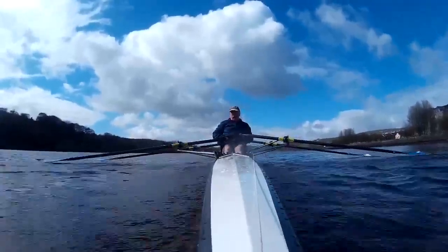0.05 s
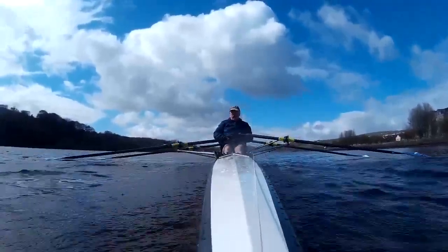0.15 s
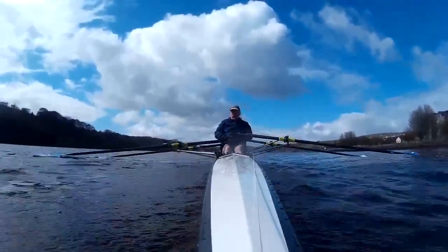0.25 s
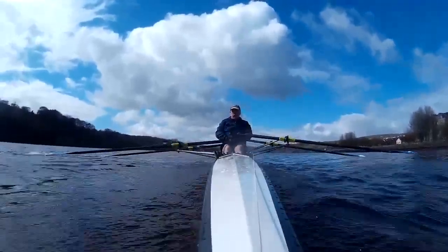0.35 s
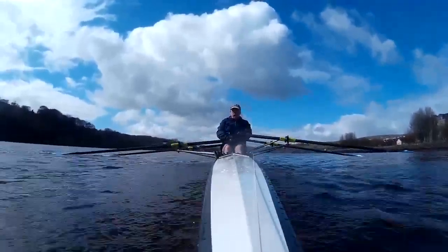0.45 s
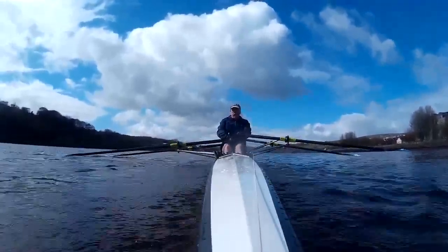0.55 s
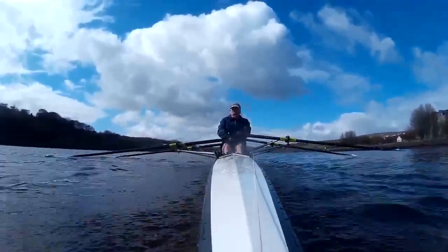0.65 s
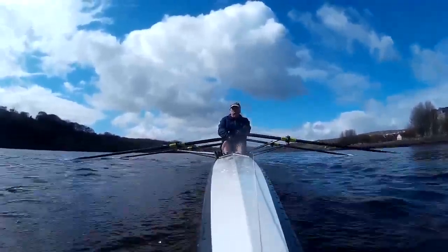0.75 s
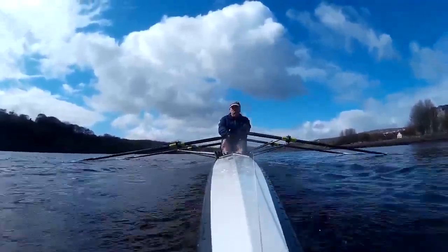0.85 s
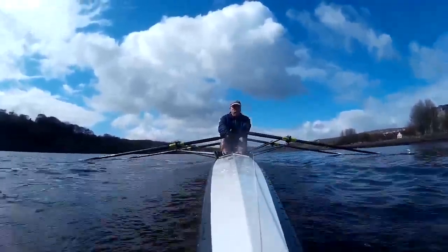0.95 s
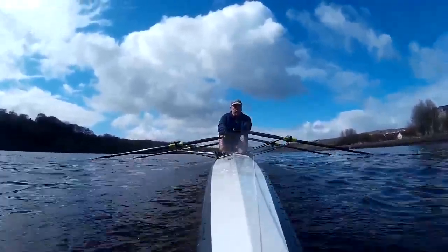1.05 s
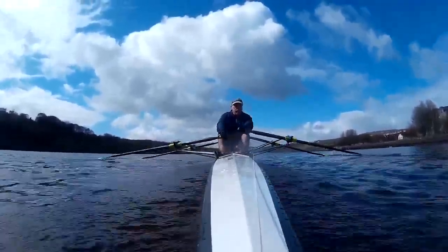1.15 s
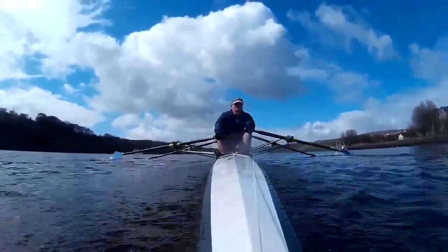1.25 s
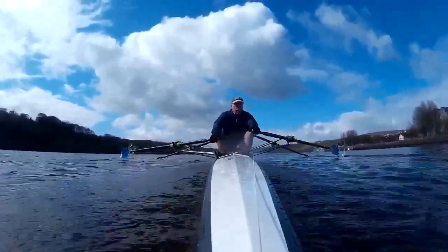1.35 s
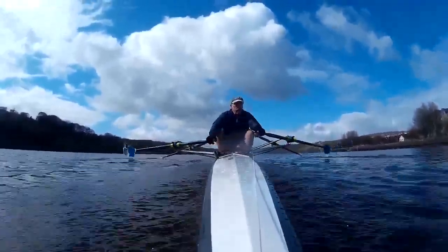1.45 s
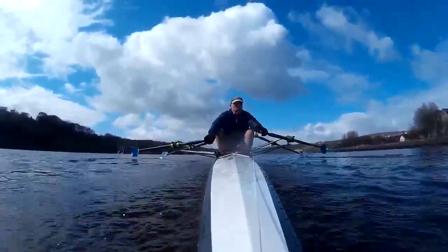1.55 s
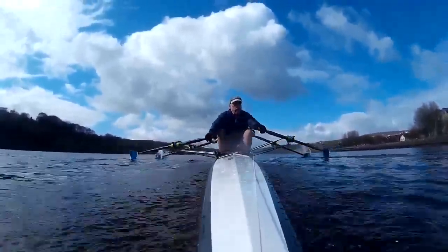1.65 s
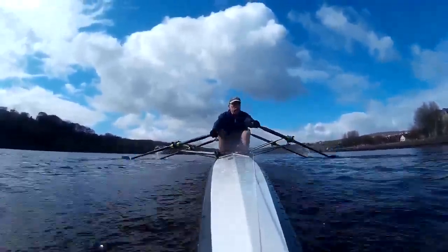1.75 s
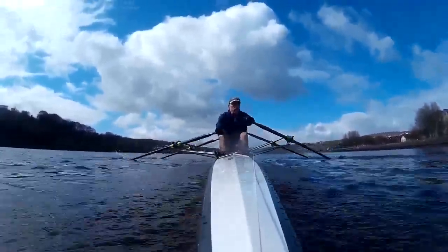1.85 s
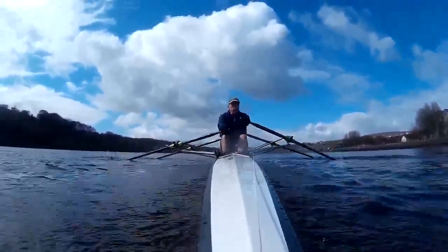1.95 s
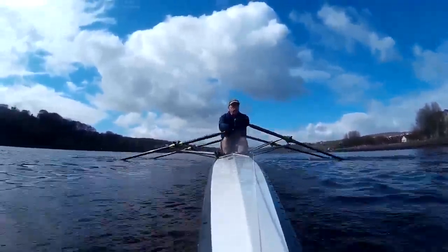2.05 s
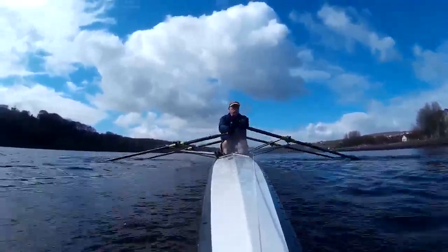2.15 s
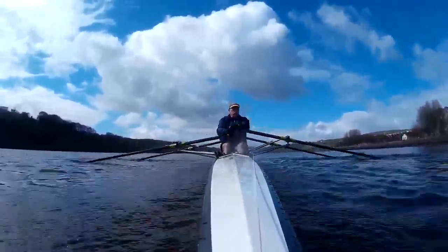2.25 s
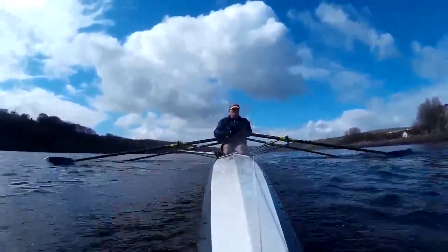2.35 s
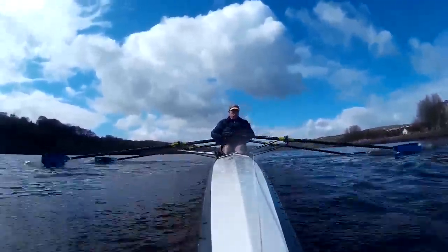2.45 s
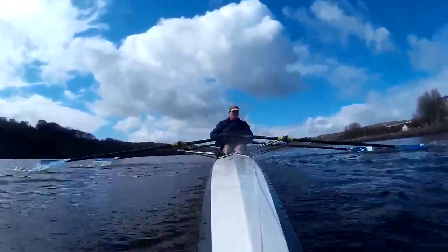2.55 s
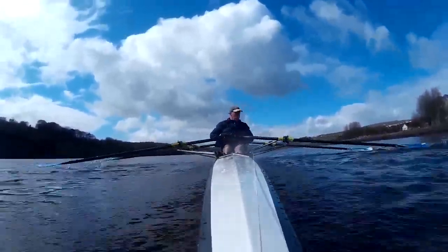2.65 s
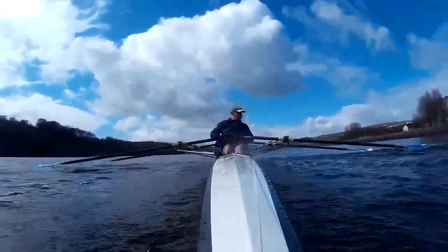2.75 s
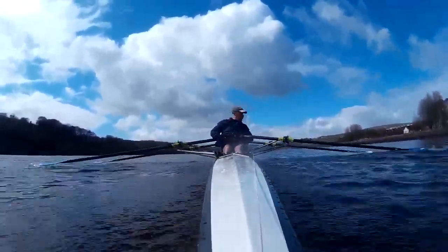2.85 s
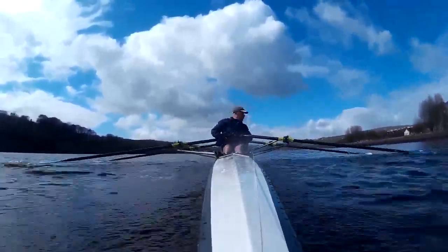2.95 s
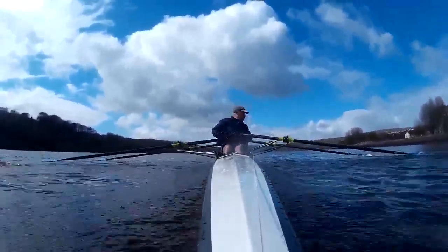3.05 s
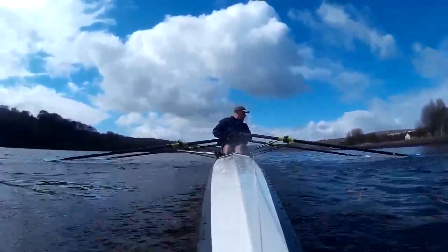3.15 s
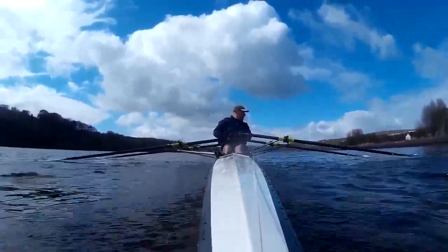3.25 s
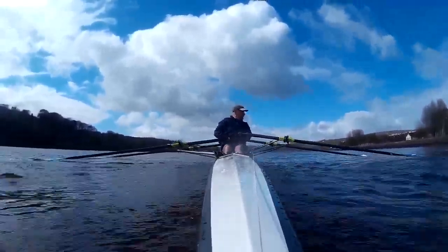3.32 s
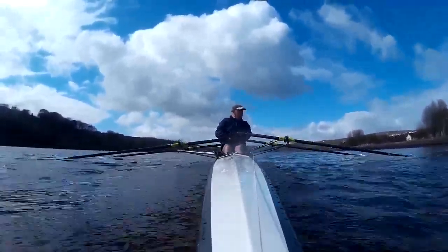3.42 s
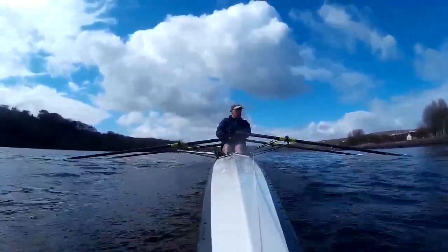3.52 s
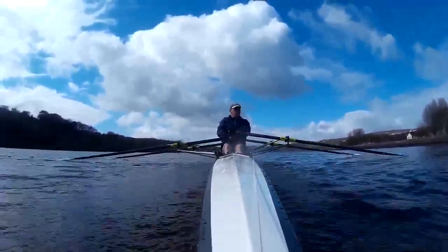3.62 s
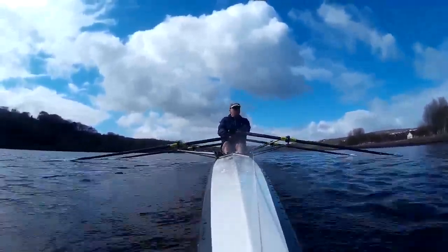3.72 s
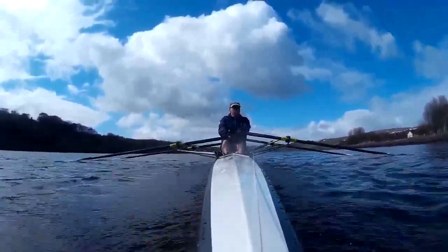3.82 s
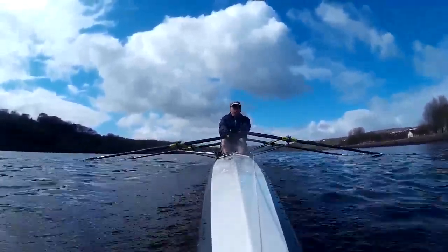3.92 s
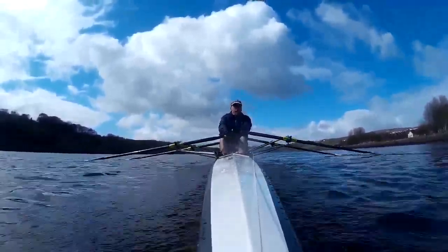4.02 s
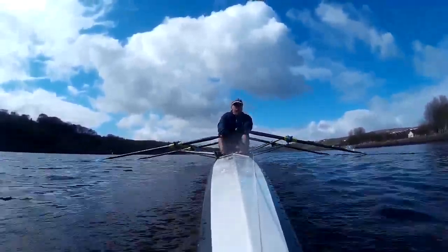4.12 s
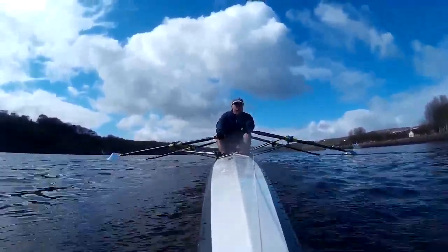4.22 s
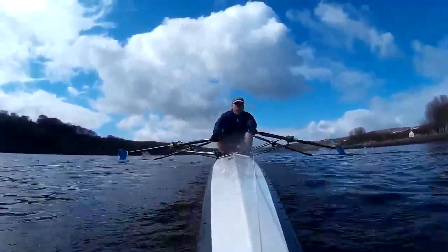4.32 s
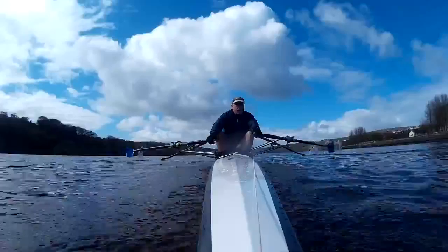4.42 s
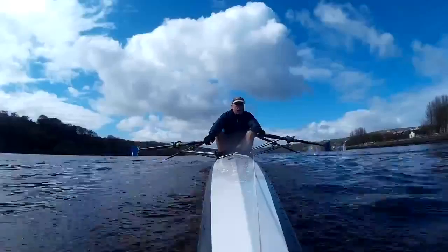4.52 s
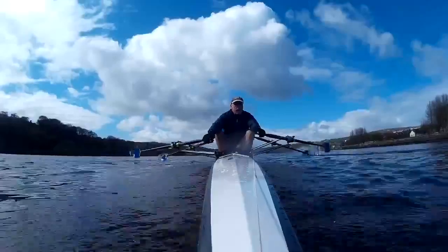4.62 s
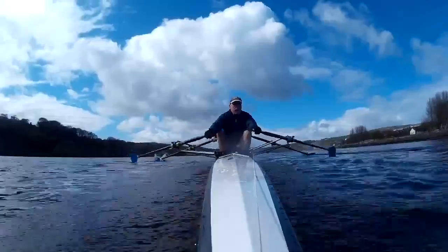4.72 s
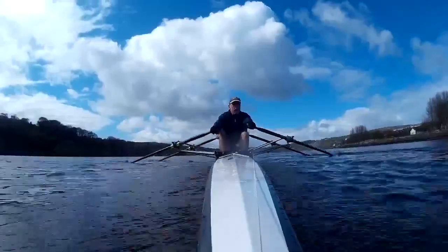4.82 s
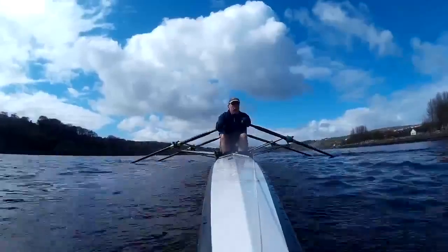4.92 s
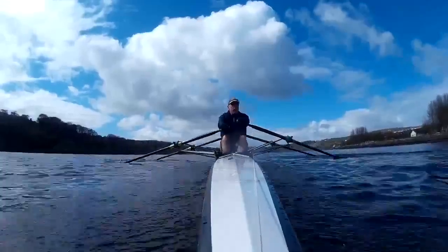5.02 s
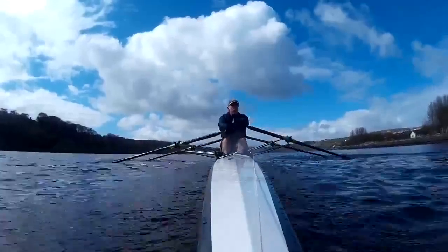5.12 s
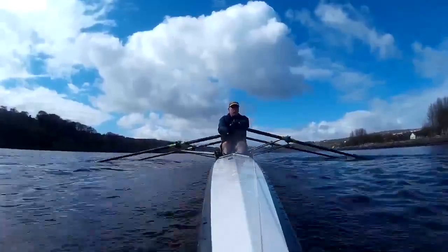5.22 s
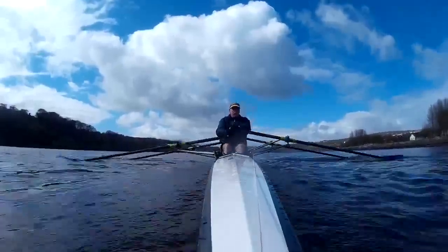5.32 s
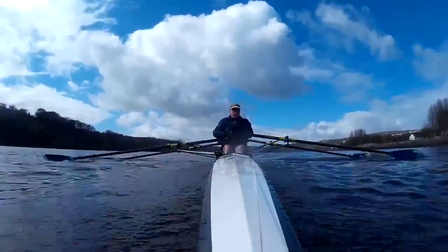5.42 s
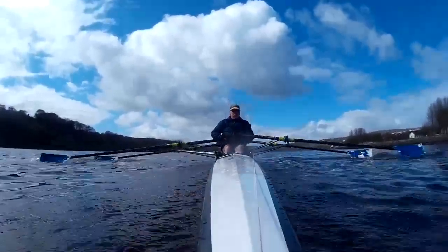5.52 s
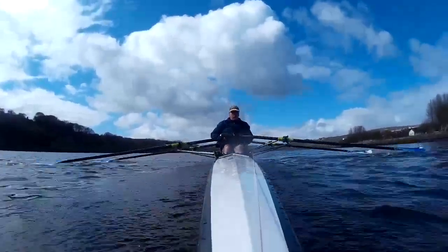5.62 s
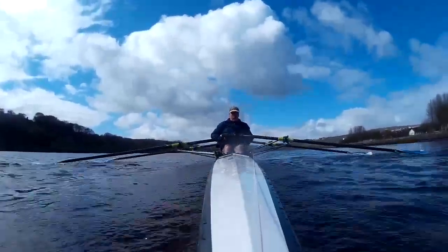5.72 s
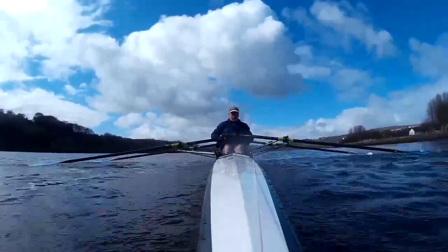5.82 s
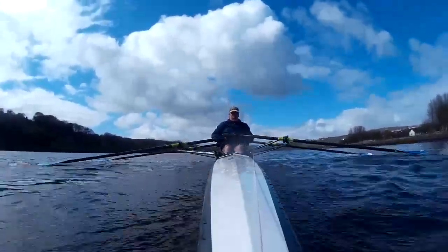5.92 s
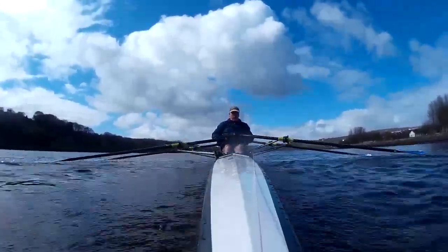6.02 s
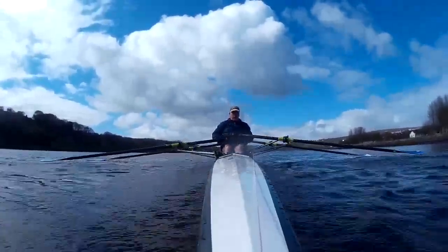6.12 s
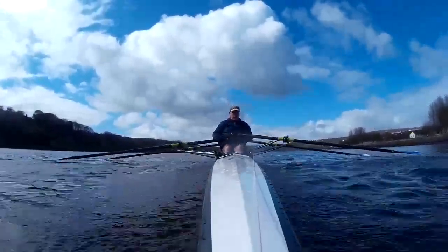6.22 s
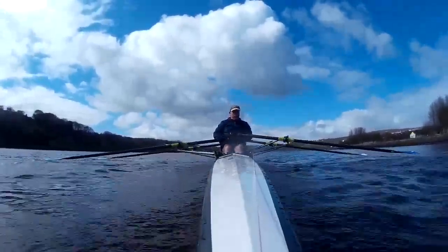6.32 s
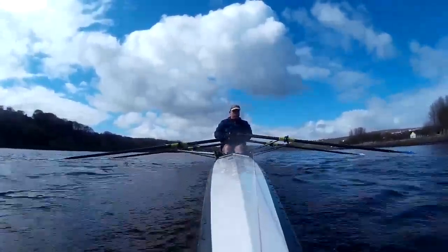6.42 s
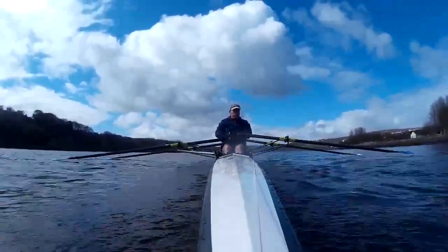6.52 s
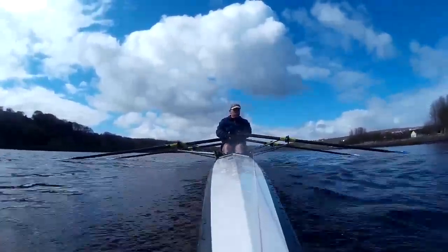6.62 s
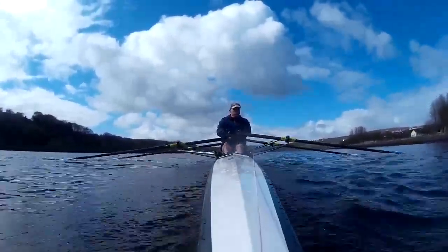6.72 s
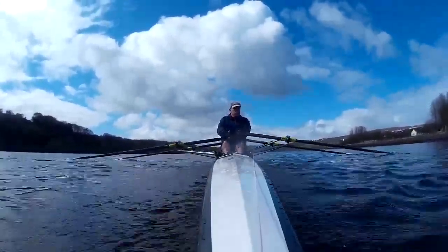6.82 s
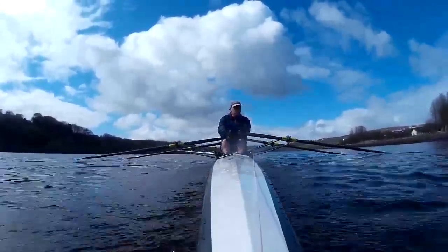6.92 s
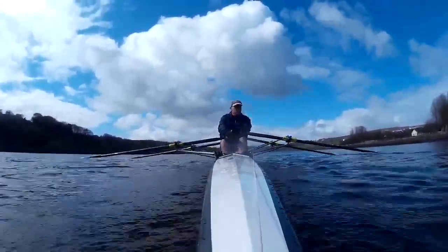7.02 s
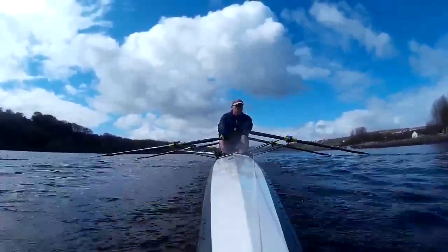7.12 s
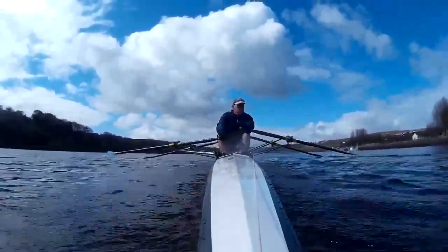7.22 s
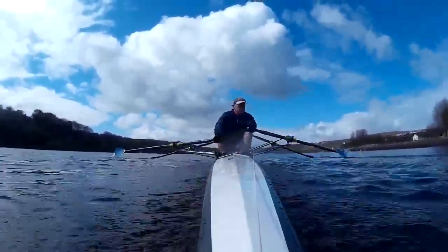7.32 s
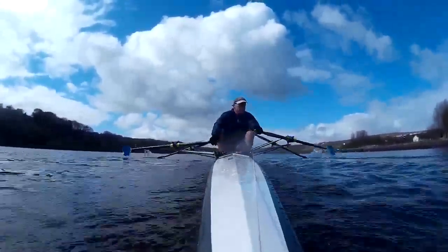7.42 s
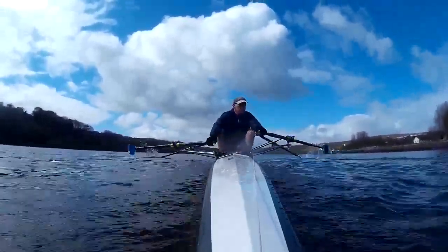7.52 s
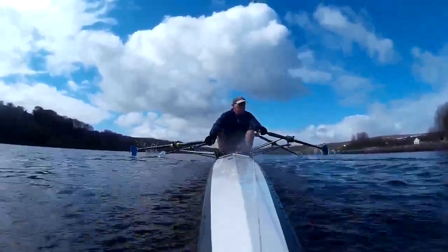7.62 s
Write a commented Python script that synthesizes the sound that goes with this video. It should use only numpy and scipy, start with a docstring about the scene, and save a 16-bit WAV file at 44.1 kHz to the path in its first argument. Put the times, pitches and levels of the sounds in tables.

```python
"""Rowing shell under way

A light rowing shell, heard through a cased microphone fixed to the deck.
The hollow hull booms as waves and strokes shake it; seats and oarlocks rumble and knock through it.
Bubbles fizz along the skin while the boat glides, thinning to single ticks during the pull.
Noise and small blows set resonances ringing; large bubbles gurgle as short gliding tones."""
import sys
import numpy as np
from scipy import signal
from scipy.fft import rfft, irfft
from scipy.io import wavfile
from scipy.ndimage import uniform_filter1d

SR = 44100
rng = np.random.default_rng(int(sys.argv[2]) if len(sys.argv) > 2 else 0)


def store_pcm(level_fs):
    """Save levels as 16-bit WAV."""
    pcm = np.round(np.clip(level_fs, -1, 1) * 32767).astype(np.int16)
    wavfile.write(sys.argv[1], SR, np.atleast_2d(pcm).T)


N = 338245
TIME = np.arange(N) / SR


def gain_of(db):
    """Turns decibels into an amplitude factor."""
    return 10 ** (np.asarray(db) / 20)


def evened(x):
    """Scales a sound to an average (RMS) level of 1."""
    return x / np.sqrt(np.mean(x ** 2) + 1e-20)


def peaked(x):
    """Scales a sound to a peak of 1."""
    return x / abs(x).max()


def resonate(x, hz, width):
    """A resonance of gain 1 whose pitch may move: shift the pitch to zero, smooth, shift back."""
    turn = np.exp(2j * np.pi * np.cumsum(hz * np.ones(len(x))) / SR)
    keep = np.exp(-np.pi * width / SR)
    return turn * signal.lfilter([1 - keep], [1, -keep], x / turn)


def ring(hz, width, rise_s, length=3000, glide=0):
    """One mode after a soft blow: a fading sine, faster fading when wider, whose pitch may glide."""
    t = np.arange(length) / SR
    tone = np.sin(2 * np.pi * hz * t * (1 + glide * t))
    fade = np.exp(-np.pi * width * t)
    soft_start = (1 - np.exp(-t / rise_s)) ** 2
    return tone * fade * soft_start


def add(mix, s, sound):
    """Mixes in a sound at s seconds, cut off at the end of the mix."""
    part = mix[round(s * SR):][:len(sound)]
    part += sound[:len(part)]


def clicks(per_s, spread_db):
    """Random impulses of either sign, most small, a few large."""
    size_db = spread_db * np.minimum(rng.exponential(1, N), 3)
    size = gain_of(size_db) * rng.choice([-1., 1.], N)
    return size * (rng.random(N) < per_s / SR)


# what sets each stroke apart: fizz_gain_db, rumble_gain_db, boom_gain_db,
# splash_gain_db (as the blades come out), extra_brightness_db_per_octave
STROKES = [(0.5, 4, 0.5, 0, 0.5), (-0.5, 3, 0, 8, -1), (2, 4, 1, 1, 0), (2.5, 3, -4.5, -0.5, -2)]
FIZZ_GAIN_DB, RUMBLE_GAIN_DB, BOOM_GAIN_DB, SPLASH_GAIN_DB, EXTRA_BRIGHTNESS = np.transpose(STROKES)
# when the blades catch the water in each stroke: start_s
CATCHES_S = [-1.53, 1.47, 4.47, 7.47]
# when the blades come out in each stroke: start_s
FINISHES_S = [-0.58, 2.42, 5.44, 8.42]
# when the seats start to slide in each stroke: start_s
SLIDES_S = [0.84, 3.72, 6.85, 9.85]
# usual times: blades buried, blades out, seats start, seats near the front: after_catch_s
USUAL_S = [0.25, 0.95, 2.35, 2.8]


def stroked(rows, gains_db):
    """Repeats one stroke's curve from every catch, stretched to its finish and slide, with its gain."""
    after_catch_s, db, *others = np.transpose(rows)
    times = []
    for catch, finish, slide in zip(CATCHES_S, FINISHES_S, SLIDES_S):
        delays = [0, finish - catch - USUAL_S[1], slide - catch - USUAL_S[2], 0]
        times.append(catch + after_catch_s + np.interp(after_catch_s, USUAL_S, delays))
    columns = [np.add.outer(gains_db, db)] + [np.tile(c, len(times)) for c in others]
    return [np.interp(TIME, np.ravel(times), np.ravel(c)) for c in columns]


# steady shaking of the hull through one stroke: after_catch_s, boom_db (before the stroke's gain)
HUM = [(0, -29), (0.3, -29), (0.62, -30.5), (0.8, -37), (0.93, -41.5), (0.97, -26), (1.3, -31), (1.42, -41),
       (1.7, -37), (2.0, -36), (2.33, -34), (2.45, -31.5), (2.9, -25.5)]
# surges as oars, seats and waves jolt the hull: peak_s, peak_db (added to the hum), pitch_hz,
# width_s (of the fall; the rise is a little shorter)
SURGES = [(0.035, -26, 109.8, 0.025), (0.224, -27.5, 106.8, 0.021), (0.3, -27, 107, 0.032),
          (0.484, -22, 103, .025), (0.6, -27.5, 106.6, 0.036), (0.74, -39.5, 101, 0.051),
          (0.87, -22.5, 111.1, 0.025), (0.94, -20, 112, .04), (1.04, -23, 114, .04),
          (1.17, -23, 112, 0.028), (1.23, -22, 109.8, 0.018), (1.33, -22.5, 107.2, 0.023),
          (1.465, -15, 114, 0.026), (1.52, -19.5, 114, 0.037), (1.62, -25.5, 105.7, 0.018),
          (1.761, -25, 125.1, 0.071), (1.871, -25, 120, 0.032), (2.05, -24, 109.5, 0.027),
          (2.141, -27.5, 107.2, 0.022), (2.46, -20.5, 116.2, .035), (2.525, -12.5, 115.8, 0.063),
          (2.619, -18, 118.3, .04), (2.705, -11.5, 106.7, .035), (2.78, -21, 108.7, 0.026),
          (2.932, -29, 116, 0.17), (3.508, -23.5, 114.5, 0.025), (3.25, -32.5, 107, 0.041),
          (3.799, -29, 106, 0.029), (3.97, -36.5, 119.7, .05), (4.188, -22.5, 106.6, 0.081),
          (4.461, -14.5, 110.2, 0.015), (4.54, -16, 113.5, 0.054), (4.7, -21, 112.5, 0.075),
          (4.86, -22, 117.5, 0.041), (5.03, -29.5, 115.5, 0.036), (5.44, -26, 109.1, 0.018),
          (5.49, -16.5, 107.8, .035), (5.555, -12.5, 121.7, 0.056), (5.669, -13, 116.2, 0.027),
          (5.765, -23.5, 119.7, 0.025), (5.876, -34.5, 107.8, 0.021), (5.994, -31, 95.4, 0.026),
          (6.198, -33.5, 96.6, 0.045), (6.321, -36.5, 99.3, 0.031), (6.44, -29.5, 100, 0.039),
          (6.599, -26, 105, 0.058), (6.878, -28.5, 110.2, 0.042), (7.099, -25, 109, 0.039),
          (7.25, -25.5, 109.3, 0.039), (7.379, -26, 111, 0.054), (7.489, -17, 112.3, 0.051),
          (7.545, -16.5, 115.8, .03), (7.67, -27, 116.7, 0.017)]


def shaking():
    """Level and pitch of the boom: bell-shaped surges over the hum, the loudest pulling the pitch its way."""
    hum_hz, waver_hz = 112.6, 4
    rise_share = 0.86  # how long a surge's rise is next to its fall
    hum_db, = stroked(HUM, BOOM_GAIN_DB)
    power = gain_of(2 * hum_db)
    waver = evened(uniform_filter1d(rng.standard_normal(N), 4000))
    pull = power * (hum_hz + waver_hz * waver)
    for s, db, hz, width in SURGES:
        side_width = np.where(TIME < s, rise_share * width, width)
        bell = gain_of(2 * db) * np.exp(-2 * ((TIME - s) / side_width) ** 2)
        power = power + bell
        pull = pull + hz * bell
    return 10 * np.log10(power), pull / power


# colour of the slosh under the boom: pitch_hz, relative_level_db (per Hz)
SLOSH_COLOUR = [(12, -34.5), (25, -21), (45, -1.5), (75, 7), (95, 11), (135, 2), (190, -11)]


def boom():
    """The lowest hull mode wavers under shaking; the next beats against it in surges; slosh fills in below."""
    level_db, hz = shaking()
    lowest = resonate(resonate(rng.standard_normal(N), hz, 12.9), hz, 36)
    lowest /= np.sqrt(np.mean(abs(lowest) ** 2))
    # turn down the random swells, so that the level mostly follows the shaking
    steady = evened((lowest / (abs(lowest) + .2) ** .7).real)

    second = rng.standard_normal(N)
    for _ in range(3):
        second = resonate(second, 162.2, 34)
    second_db = -13.5 + 1.257 * level_db  # grows faster than the lowest mode

    f, db = np.transpose(SLOSH_COLOUR)
    bins = np.fft.rfftfreq(N, 1 / SR)
    colour = gain_of(np.interp(np.log(bins + 1), np.log(f + 1), db, left=-60, right=-60))
    slosh = evened(irfft(colour * rfft(rng.standard_normal(N)), N))
    slosh_db = -24.0 + 0.38 * uniform_filter1d(level_db, 3000)

    return gain_of(level_db) * steady + gain_of(second_db) * evened(second.real) + gain_of(slosh_db) * slosh


# seats rolling and riggers working through one stroke: after_catch_s,
# rumble_db (before the stroke's gain), tilt_db_per_octave
ROLL = [(0.05, -52, -2), (0.2, -51.5, -4), (0.4, -48, 0), (0.62, -52.5, 4.5), (0.9, -52, 4.5),
        (1.1, -50.5, 2.5), (1.4, -60.5, 3), (1.7, -57.5, 1.5), (2.0, -58.5, 1), (2.3, -57, 5),
        (2.4, -51.5, 2.5), (2.6, -48.5, -1), (2.8, -48, 0)]
# hull modes above the boom, also rung by the knocks, which widen them and halve their levels:
# pitch_hz, width_hz, relative_level_db
HULL = [(157, 25, -0.5), (198, 12, -12), (234.4, 30, 6), (312.5, 10.6, -2.5), (357.4, 29, -0.5),
        (494.4, 40, -2), (512.2, 35, -0.5), (614, 41, -0.5), (683, 37, -5), (773, 24, -15.5),
        (969, 41, -17.5), (1140, 130, -26)]


def rumble():
    """Wheels and fittings jolt the hull in many small bumps, each ringing a hull mode."""
    level_db, tilt = stroked(ROLL, RUMBLE_GAIN_DB)
    out = np.zeros(N)
    for hz, width, db in HULL:
        bumps = signal.oaconvolve(clicks(100, 3.3), ring(hz, width, 0.00037))[:N]
        out += gain_of(db + tilt * np.log2(hz / 400)) * evened(bumps)
    return gain_of(level_db) * evened(out)


# water along the skin through one stroke: after_catch_s,
# fizz_db (before the stroke's gain and splash), brightness_db_per_octave (before the stroke's extra)
GLIDE = [(0, -52, 1), (0.215, -57, -3), (0.25, -70, -13), (0.5, -72.5, -8.5), (0.68, -70.5, 0),
         (0.79, -60, -9.5), (0.92, -52, -1), (1.3, -49, -3), (1.7, -46, -2.5), (1.95, -47.5, -2),
         (2.2, -49, -2), (2.45, -47.5, -0.5), (2.7, -46.5, 0)]
# modes of the thin deck and the case, narrowed by each sound that rings them:
# pitch_hz, width_hz, relative_level_db (the level is for the fizz only)
DECK = [(975, 180, -12.5), (1216, 110, -9), (1357, 91, -5), (1539, 180, -4.5), (1820, 130, 0),
        (1975, 111, 0), (2088, 120, -1.5), (2460, 270, -4), (2731, 220, -20), (3186, 200, -11),
        (3403, 200, -13), (3814, 270, -13), (4500, 360, -24.5), (5630, 440, -26)]


def fizz():
    """Bubbles burst on the skin in clumps; some ring one deck mode, some all of them."""
    splash_s, splash_lead_s = 0.18, 0.035  # half-width of the splash, and its peak before the finish
    level_db, bright = stroked(GLIDE, FIZZ_GAIN_DB)
    for gain_db, finish in zip(SPLASH_GAIN_DB, FINISHES_S):
        level_db = level_db + gain_db * np.exp(-((TIME - finish + splash_lead_s) / splash_s) ** 2)
    bright = bright + np.interp(TIME, FINISHES_S, EXTRA_BRIGHTNESS)
    clumps = gain_of(1.7 * evened(uniform_filter1d(rng.standard_normal(N), 1500)))
    shared = clicks(100, 3.9)
    out = np.zeros(N)
    for hz, width, db in DECK:
        bursts = clicks(170, 4.17) + .5 * shared
        sound = signal.oaconvolve(bursts * clumps, ring(hz, 0.73 * width, 0.00032))[:N]
        out += gain_of(db + bright * np.log2(hz / 1800)) * evened(sound)
    return gain_of(level_db) * out / np.linalg.norm(gain_of(np.transpose(DECK)[2]))


# larger bubbles and drops against the skin: start_s, peak_db, pitch_hz, upper_ring_peak_db
TICKS = [(0.1241, -30, 1810, -54), (0.3572, -30.5, 2120, -53), (0.8029, -29, 1950, -50),
         (1.2998, -33.5, 1920, -51), (1.6122, -38, 1790, -51), (1.6613, -38.5, 2080, -64),
         (1.6846, -42, 2030, -64), (1.782, -54, 1590, -60), (1.927, -57, 1730, -54),
         (1.9478, -43.5, 1650, -58), (2.0507, -47.5, 2230, -78), (2.1201, -42, 1980, -56),
         (2.144, -43.5, 1780, -51), (2.1634, -48, 2470, -64), (2.1999, -48, 1970, -64),
         (2.2556, -35, 1980, -50), (2.292, -30.5, 1990, -59), (2.3326, -35, 2070, -48),
         (2.391, -31.5, 1470, -45), (2.4628, -35, 1830, -61), (2.9512, -34, 1800, -63),
         (3.214, -29, 2100, -60), (3.461, -39, 2060, -43), (3.6074, -32, 1960, -66),
         (4.647, -46, 2080, -50), (4.6583, -37.5, 1890, -64), (4.6836, -56.5, 1400, -57),
         (4.8329, -52, 1540, -64), (4.868, -49.5, 1610, -53.5), (4.9786, -60, 1470, -53.5),
         (5.0519, -42.5, 1640, -52.5), (5.0894, -44.5, 1640, -77), (5.1243, -50, 1850, -75),
         (5.162, -59, 1400, -67), (5.1981, -51, 2500, -69), (5.2338, -42, 1810, -69),
         (5.2701, -34.5, 1460, -36.5), (5.396, -41, 2150, -46.5), (5.998, -31.5, 1790, -59),
         (6.0492, -30, 1950, -47), (6.1499, -32.5, 2130, -50.5), (6.2936, -31, 1970, -47),
         (6.4044, -39, 1820, -41), (6.5186, -29, 1670, -51), (6.5553, -36, 1920, -43.5),
         (6.7915, -38, 1990, -60), (7.1766, -34.5, 1920, -54), (7.3582, -33.5, 1830, -49),
         (7.4584, -40, 1890, -46.5), (7.4954, -33, 1840, -50)]


def ticks():
    """Each tick rings the deck modes near its pitch, and a changing blend of the upper ones."""
    out = np.zeros(N)
    upper = [(f, width) for f, width, _ in DECK if 3000 < f < 4000]
    blends = rng.uniform(0.33, 1, (len(TICKS), len(DECK)))
    for (s, db, hz, upper_db), blend in zip(TICKS, blends):
        tick, high = np.zeros(3000), np.zeros(3000)
        for share, (f, width, _) in zip(blend, DECK):
            if f < 3000:
                nearness = gain_of(-40 * abs(np.log2(f / hz)))
                tick += nearness * share * ring(f, 0.86 * width, 0.0005)
        for share, (f, width) in zip(blend[::-1], upper):
            high += share * ring(f, 0.61 * width, 0.00089)
        add(out, s, gain_of(db) * peaked(tick) + gain_of(upper_db) * peaked(high))
    return out


# oarlock and seat knocks: start_s, upper_peak_db, strongest_upper_pitch_hz,
# low_peak_db, strongest_low_pitch_hz
KNOCKS = [(0.216, -42, 495, -38, 210.5), (0.442, -45, 525, -29.5, 226), (0.849, -33.5, 479, -33.5, 240),
          (1.204, -39, 530, -30, 231), (1.361, -48, 627, -37, 232), (1.414, -31, 608, -26, 240),
          (1.445, -26.5, 511, -26.5, 234), (1.619, -29, 501, -27.5, 210), (1.638, -40.5, 519, -34.5, 307),
          (1.75, -35.5, 506, -35.5, 210), (1.903, -31.5, 519, -37, 207), (1.992, -37.5, 514, -33.5, 215),
          (2.129, -47, 600, -44.5, 266), (2.423, -36.5, 498, -25, 208), (2.465, -34, 501, -26, 210),
          (2.488, -30, 603, -22, 210), (2.506, -29, 495, -25, 255), (2.528, -32, 528, -27, 290),
          (2.556, -39, 509, -26, 255), (2.6, -26, 622, -29.5, 237), (2.645, -33.5, 514, -31, 209),
          (2.787, -36, 541, -39, 256), (2.877, -42, 490, -31, 248), (3.453, -42.5, 490, -46, 242),
          (3.7, -45, 813, -36, 229), (4.143, -34.5, 506, -40, 208), (4.289, -37, 619, -36, 229),
          (4.369, -26, 506, -26.5, 242), (4.43, -28.5, 587, -28.5, 323), (4.47, -22, 503, -19.5, 213),
          (4.509, -35, 630, -44, 320), (4.646, -34, 503, -37, 207), (4.68, -29, 476, -36.5, 231),
          (4.785, -37.5, 611, -34, 229), (4.83, -36.5, 441, -37, 290), (4.96, -39, 455, -31.5, 310),
          (5.328, -36.5, 611, -53, 229), (5.451, -33, 479, -28.5, 242), (5.472, -41, 506, -22, 203),
          (5.51, -28.5, 501, -23.5, 305), (5.559, -31.5, 458, -23.5, 207), (5.573, -45.5, 641, -25, 330),
          (5.63, -29.5, 519, -33, 207), (6.578, -47.5, 455, -32, 267), (7.061, -45, 511, -42, 240),
          (7.422, -33, 600, -27.5, 250), (7.465, -24.5, 490, -26, 207), (7.504, -26, 536, -23, 298)]


def knocks():
    """Each blow rings the hull modes nearest its low and upper pitches; the loose oar rattles after it."""
    out = np.zeros(N)
    chances = rng.random((len(KNOCKS), len(HULL), 2))
    for (s, db, hz, low_db, low_hz), chance in zip(KNOCKS, chances):
        low, high = np.zeros(5000), np.zeros(5000)
        for (f, width, mode_db), (side, late) in zip(HULL, chance):
            if f < 420:
                part, level_db = low, -14 * abs(np.log2(f / low_hz))
            else:
                part, level_db = high, -24 * abs(np.log2(f / hz))
            sign = np.sign(side - .5)
            sound = sign * gain_of(level_db + .5 * mode_db) * ring(f, 1.42 * width, 0.0017)
            add(part, 0, sound)
            add(part, 0.00791 + .024 * late, gain_of(-5) * sound)  # the rattle
        add(out, s, gain_of(low_db) * peaked(low) + gain_of(db) * peaked(high))
    return out


# gurgles under the hull: start_s, level_db, start_pitch_hz,
# glide_per_s (half the pitch change in a second, as a share of the start pitch; minus falls)
GURGLES = [(1.788, -44, 960, 0), (1.809, -53, 1055, -2), (2.928, -43, 795, -3.5), (3.126, -40, 810, -1.5),
           (3.212, -49, 830, -1), (3.702, -46, 830, -3), (4.835, -39.5, 775, 2.5), (4.839, -42, 946, 0.3),
           (5.052, -48, 1030, -1.5), (5.056, -39, 730, -8.5), (5.272, -43, 1306, -1), (5.293, -43, 800, 3)]


def gurgles():
    """Large bubbles: short fading tones that glide up or down, or hold."""
    out = np.zeros(N)
    for s, db, hz, glide in GURGLES:
        add(out, s, gain_of(db) * ring(hz, 22, 0.00087, glide=glide))
    return out


def scene():
    """All the sounds of the boat together, in one channel."""
    return (boom() + rumble() + fizz() + ticks() + knocks() + gurgles())[None]


def record(dry):
    """Microphone hiss rises a little in quiet moments; then a filter removes the highest treble."""
    edge_hz = 15700
    power_db = 10 * np.log10(abs(uniform_filter1d(dry[0] ** 2, 4000)) + 1e-12)
    hiss_db = -71.5 + 0.28 * np.maximum(-21.5 - power_db, 0)
    hiss = gain_of(hiss_db) * rng.standard_normal(N)
    low_pass = signal.firwin(255, edge_hz, window=("kaiser", 7), fs=SR)
    return signal.oaconvolve(dry + hiss, low_pass[None], "same")


dry = scene()
out = record(dry)
store_pcm(out)
```